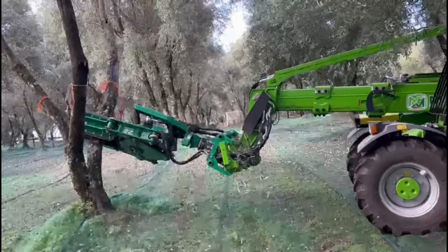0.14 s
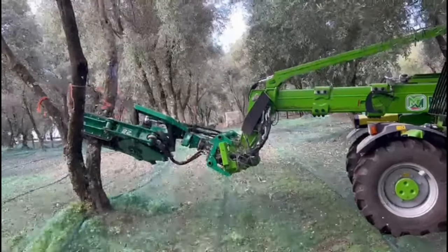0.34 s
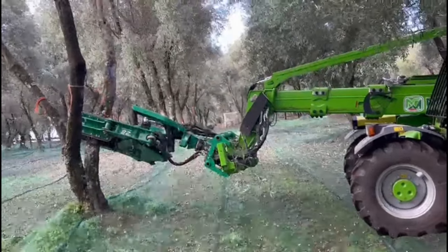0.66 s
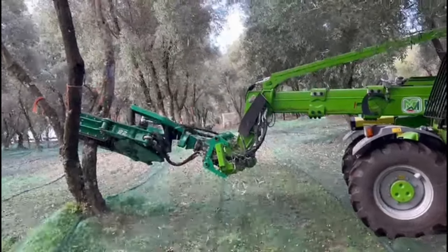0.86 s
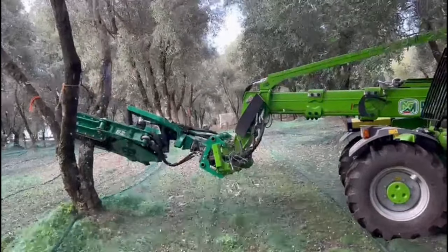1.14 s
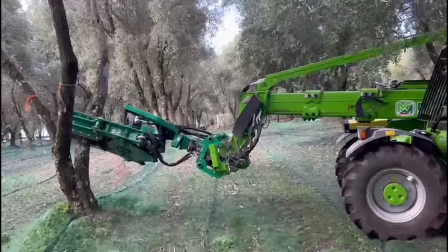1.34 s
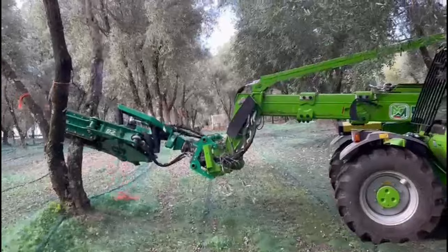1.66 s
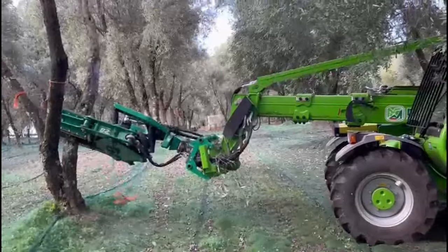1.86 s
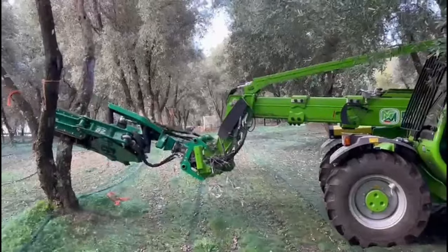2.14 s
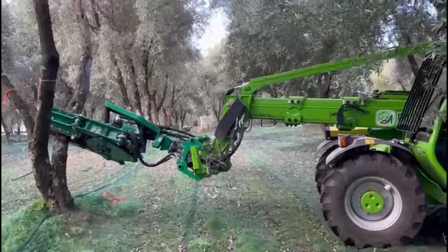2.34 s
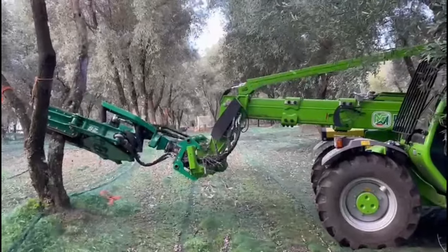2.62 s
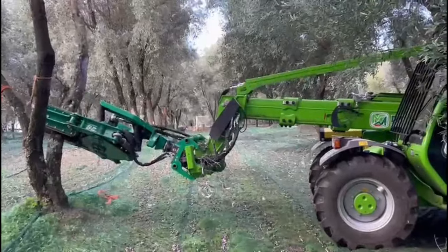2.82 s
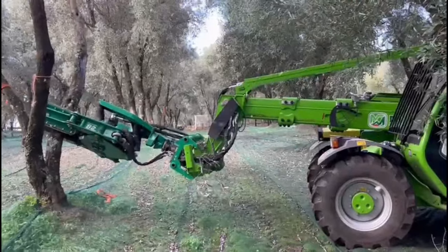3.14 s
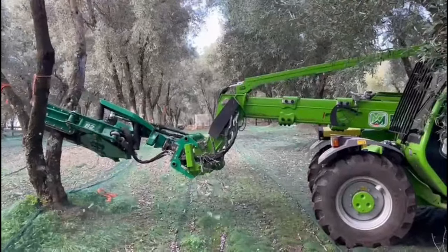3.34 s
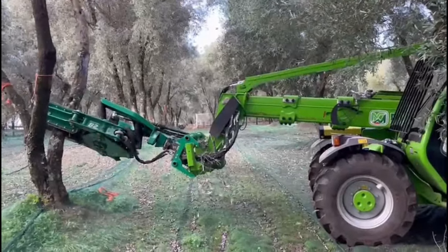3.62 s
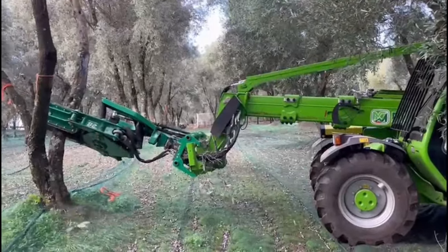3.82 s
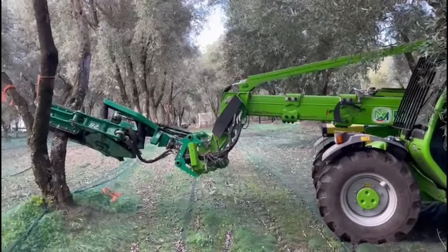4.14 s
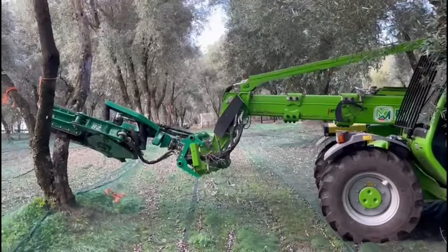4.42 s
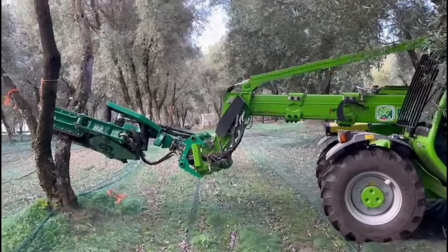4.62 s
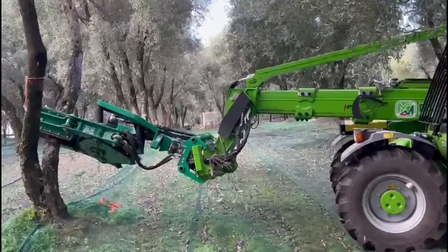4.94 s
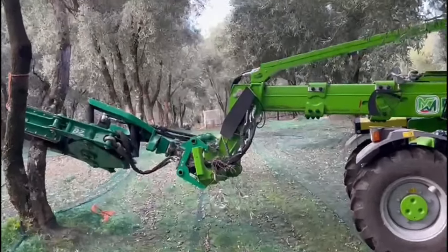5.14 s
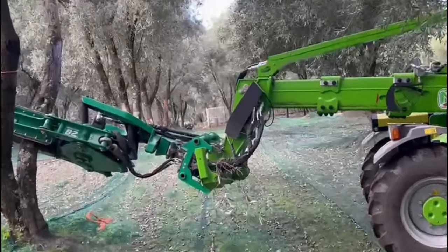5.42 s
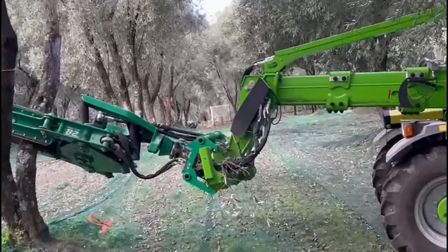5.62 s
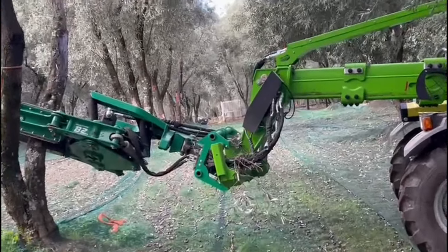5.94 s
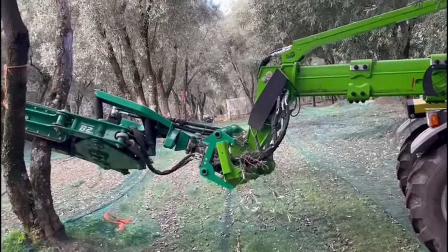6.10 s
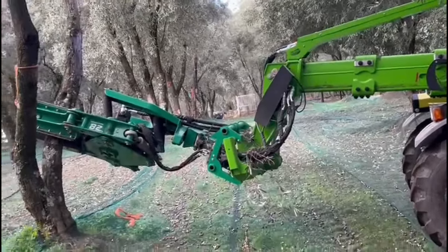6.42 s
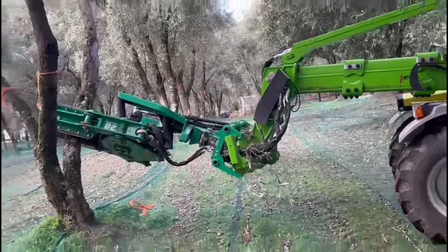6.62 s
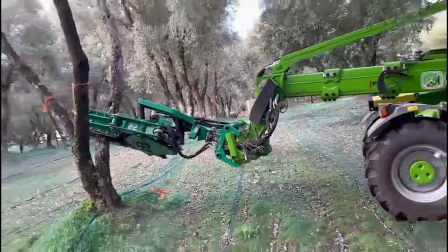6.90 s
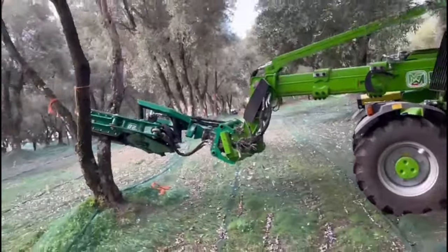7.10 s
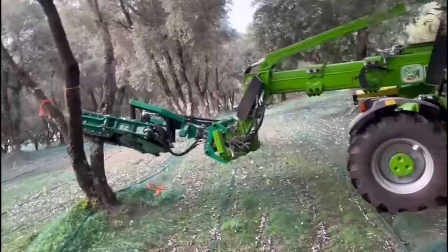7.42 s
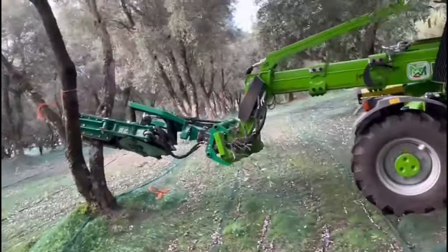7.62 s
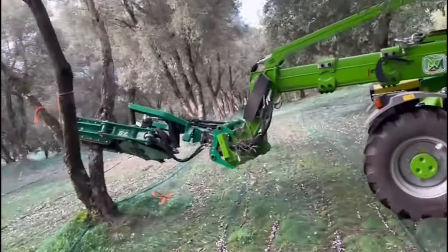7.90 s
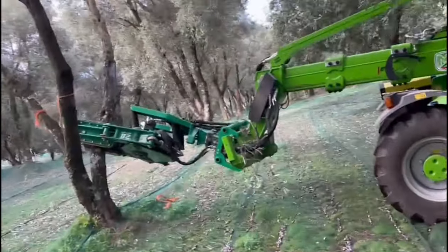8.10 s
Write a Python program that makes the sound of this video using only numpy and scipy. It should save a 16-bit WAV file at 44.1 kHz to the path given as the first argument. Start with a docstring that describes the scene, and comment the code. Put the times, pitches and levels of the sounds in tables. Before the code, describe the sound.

Outdoors in an olive grove, close stereo. A tractor-mounted shaker drones with a harsh, fast clamp rattle, whining oil drive and dense leaf hiss. After about two seconds it winds down, the boom shuddering and steel jaws knocking. The diesel drops to a clattering idle while olives tick and thud onto netted soil. Finally the engine revs up hard with rough howls and a thin whistle.

```python
"""An olive grove, outdoors: a tree a little left, a tractor a little right, a close pair of microphone ports.
A hydraulic shaker on the boom grips the tree: its weights hum at 28 turns a second, the clamp rattles on
slams twice a turn and the crown hisses with small leaf slaps. The weights run down, steel modes shudder and
knock, and olives patter as short noise bursts while the diesel, tones and impacts locked to its crank, idles.
Near the end the engine revs up again, with howls and a thin oil whistle; a faint drone runs throughout."""
import sys
import numpy as np
from scipy import signal
from scipy.fft import rfft, irfft
from scipy.io import wavfile

SR = 44100
rng = np.random.default_rng(int(sys.argv[2]) if len(sys.argv) > 2 else 0)


def transcribe(u):
    """Save the signal u as a 16-bit wav file named by the first command-line argument.

    u: samples, shape (n,) or (channels, n), limited to [-1, 1]; the rate is SR.
    q: integer samples, one column per channel.
    """
    v = np.clip(np.atleast_2d(u).T, -1, 1)
    q = np.round(v * 32767).astype(np.int16)
    wavfile.write(sys.argv[1], SR, q)


N = 364266
T = np.arange(N) / SR
HZ = np.fft.rfftfreq(N, 1 / SR)

# the driver shuts the oil valve and lets go of the throttle, then opens the throttle again (s)
STOP_S, REV_S = 2.39, 7.25
# crankshaft speed while shaking, idling and revved up (turns per s)
WORK_HZ, IDLE_HZ, FULL_HZ = 36.29, 15, 38.7
# time the engine takes to run down and to run up (s)
RUN_DOWN_S, RUN_UP_S = 1.2, 0.93


def gain_of(db):
    """Decibels to amplitude."""
    return 10 ** (np.asarray(db) / 20)


def evened(x):
    """Scaled to rms 1."""
    return x / np.sqrt(np.mean(x ** 2) + 1e-20)


def since(s):
    """Seconds gone by since time s, zero before it."""
    return np.maximum(T - s, 0)


def settle(s, length_s):
    """Goes from 0 to 1 after time s, quickly at first and easing in at the end."""
    return 1 - (1 - np.minimum(since(s) / length_s, 1)) ** 2


def bump(peak_s, half_s):
    """A smooth rise to 1 and fall around a moment."""
    return np.exp(-((T - peak_s) / half_s) ** 2)


def spectrum(rows):
    """Levels of a frequency table at every bin, joined by straight lines over log frequency."""
    rows = np.array(rows)
    return np.interp(np.log(HZ + 1), np.log(rows[:, 0]), rows[:, 1])


def drift(rate_hz):
    """Slow random wandering of rms 1."""
    smooth = np.exp(-(HZ / rate_hz) ** 2)
    return evened(irfft(rfft(rng.standard_normal(N)) * smooth, N))


def coloured(x, rows, band):
    """Causal filter with the given spectrum; white noise of rms 1 comes out with rms 1 inside the band (Hz)."""
    log_gain = np.log(gain_of(spectrum(rows)))
    mirrored = np.r_[log_gain, log_gain[-2:0:-1]]
    response = np.exp(np.conj(signal.hilbert(mirrored)))[:len(HZ)]  # minimum phase
    inside = (HZ > band[0]) & (HZ < band[1])
    return irfft(rfft(x) * response, N) / np.sqrt(np.mean(abs(response) ** 2 * inside))


def add(mix, s, sound):
    """Mixes a sound in at time s."""
    part = mix[round(s * SR):][:len(sound)]
    part += sound[:len(part)]


def turns_of(speed, wobble):
    """Angle of a shaft, in turns, whose speed wavers a little."""
    return np.cumsum(speed * (1 + wobble * drift(12))) / SR


# Resonances and a notch of the exhaust pipe and the boom's steel box, which lift or dip any tone crossing them.
# Each row: centre in Hz, width in Hz, lift in dB.
RESONANCES = [(67.6, 3.3, 7), (73.7, 3, -4), (80.1, 9.5, 8), (111, 6.8, 7), (132.5, 7.6, 12),
              (336.2, 51, 8.5)]


def tone(turns, multiple, db, waver):
    """One order of a shaft, wavering in level and lifted while it crosses a resonance."""
    hz = multiple * np.gradient(turns) * SR
    lift_db = sum(peak_db / (1 + (2 * (hz - centre) / width) ** 2) for centre, width, peak_db in RESONANCES)
    slow = np.interp(T, np.linspace(0, T[-1], 120), rng.standard_normal(120))
    level = np.sqrt(2) * gain_of(db + lift_db) * (1 + waver * slow)
    return level * np.sin(2 * np.pi * (multiple * turns + rng.random()))


def contacts(turns, rough, count):
    """Small impacts that come back at the same shaft angles every turn, mixed with a share of plain noise."""
    angle, size = rng.random(count), evened(rng.standard_normal(count))
    impact_turns = np.arange(int(turns[-1]) + 1)[:, None] + angle
    at = np.interp(impact_turns, turns, np.arange(N)).astype(int)
    clicks = np.bincount(at.ravel(), np.tile(size, len(at)), N) * (T < T[-1])
    repeating = clicks / np.sqrt(count * np.gradient(turns))
    share = np.clip(rough, 0, 1)
    return np.sqrt(1 - share) * repeating + np.sqrt(share) * rng.standard_normal(N)


def strokes(turns, decay, rest):
    """A burst that dies away within each cycle (decay in cycles), over a resting level."""
    return evened(rest + np.exp(-(turns % 1) / decay))


def crank_speed():
    """Crank turns per second: eased from working speed down to idle, and later up to full speed."""
    down = (IDLE_HZ - WORK_HZ) * settle(STOP_S, RUN_DOWN_S)
    up = (FULL_HZ - IDLE_HZ) * settle(REV_S, RUN_UP_S)
    return WORK_HZ + down + up


# Steady notes beside the engine. Each row: pitch in Hz, level in dB before resonances.
DRONE = [(187.5, -57), (586, -56.5), (600, -62.5), (809, -57.5)]


def drone():
    """A few faintly wavering notes hold their pitch whatever the engine does."""
    return sum(tone(turns_of(hz, wobble=0.0015), 1, db, waver=0.2) for hz, db in DRONE)


def whistle(pitch_hz=4135, slide_hz=130, level_db=-56, start_s=7.82, rise_s=0.2):
    """Oil rushing through a valve sings one thin note that slides up into its pitch."""
    rise = settle(start_s, rise_s)
    hz = (pitch_hz - slide_hz * (1 - rise)) * (1 + 0.003 * drift(60))
    return np.sqrt(2) * gain_of(level_db) * rise * np.sin(2 * np.pi * np.cumsum(hz) / SR)


# Howls of the run-up.
# Each row: multiple of crank speed, level in dB before resonances, loudest at in seconds, half length in seconds.
HOWLS = [(12.35, -40, 7.53, .12), (13, -41, 7.68, .055), (18.75, -49, 7.69, .07), (15.8, -42, 7.93, .05)]


def howl(crank):
    """Rough tones at multiples of crank speed flare up and die at set moments of the run-up."""
    return sum(bump(peak_s, half_s) * (1 + 0.25 * drift(45)) * tone(crank, k, db, waver=0.1)
               for k, db, peak_s, half_s in HOWLS)


# Exhaust note. Each row: multiple of crank speed, relative dB at idle, relative dB at full throttle.
EXHAUST = [(2, -14, 0.5), (3, -17, -12), (4, -1.5, -12), (5, -13, -8), (6, -8.5, -6.5), (8, -11.5, -13),
           (9, -16, -18)]
# Exhaust orders of the firing pulses, which answer the throttle first (multiples of crank speed).
FIRING_ORDERS = (2, 4)
# Gears and belt drives, while the speed holds steady.
# Each row: multiple of crank speed, dB at idle, dB at full throttle, before resonances.
GEARS = [(15, -72, -49), (18, -62.5, -74), (27, -70, -51), (29, -63.5, -70), (32, -68, -62), (34, -63, -63),
         (45, -66, -68), (57, -65.5, -72), (69, -67, -70)]
# Loudness of each cylinder's injector, in firing order, in dB.
CYLINDERS_DB = [2.2, -.8, -.3, -1.4]
# Spectra of the engine block, idling and pulling. Each row: frequency in Hz, relative dB per Hz.
BLOCK_IDLE = [(20, -6), (60, 8.5), (120, 1), (300, 3.5), (620, 1), (1250, -1), (1600, -5), (2500, -43),
              (6000, -36.5)]
BLOCK_PULLING = [(20, 7), (60, -2), (330, 12), (450, 4.5), (620, 4.5), (740, 1), (830, 3.5), (1040, 6.5),
                 (1130, -7), (1230, 1.5), (1600, -6), (2200, -13.5), (6000, -42)]
# Spectra of the injectors, idling and pulling. Each row: frequency in Hz, relative dB per Hz.
INJECTORS_IDLE = [(1650, -0.5), (2010, 10), (2280, 2), (2620, 5), (2790, 11), (3100, 1), (3260, 4),
                  (3650, 2.5), (3880, -6.5), (4600, -1.5), (4900, -6), (5800, -7), (6350, -12),
                  (8000, -14.5), (12000, -35)]
INJECTORS_PULLING = [(1400, -11), (1950, -1), (2270, -3.5), (2450, 3), (2560, -2), (2740, 6.5),
                     (2900, -2.5), (3240, 3), (3500, 1.5), (5000, -1.5), (7000, -5.5), (12000, -25)]


def exhaust_note(crank, pace, fuel, load):
    """Firing pulses sound as crank orders; their levels follow speed, fuel and load."""
    base_db = -52.5 - 0.5 * pace
    # the pulses hit harder while the engine still turns slowly under open throttle, which snaps open in 0.075 s
    revved_db = (14 + 3.5 * (1 - pace)) * settle(REV_S, 0.075)
    # opening the jaws loads the engine for a while
    jaws_db = 6.5 * (settle(3.41, 0.17) - settle(4.2, 0.17))
    # the upper orders burble as the engine sags into idle
    burble_db = 8 * bump(3.45, 0.35)
    note = 0
    for k, idle_db, full_db in EXHAUST:
        rev_db = revved_db * (1 if k in FIRING_ORDERS else load)
        extra_db = jaws_db if k < 7 else burble_db
        db = base_db + rev_db + extra_db + idle_db + (full_db - idle_db) * fuel
        note = note + tone(crank, k, db, waver=0.22)
    return note


def gear_tones(crank, load, sweep_hz_per_s=16):
    """Meshing teeth and belts sing at crank multiples and fade while the speed sweeps."""
    gears = sum(tone(crank, k, idle_db + (full_db - idle_db) * load, waver=0.18)
                for k, idle_db, full_db in GEARS)
    return gears / (1 + (np.gradient(crank_speed()) * SR / sweep_hz_per_s) ** 2)


def block_noise(crank, pace, cylinder, idle_db=-55, full_db=-43):
    """Firing thuds shake the block at idle; a steadier growl takes over as the engine pulls."""
    thuds = cylinder * contacts(crank, rough=0.55, count=600) * strokes(2 * crank, decay=0.21, rest=0.9)
    growl = contacts(crank, rough=0.65, count=300) * strokes(2 * crank, decay=0.25, rest=1.9)
    roar_db = 2.5 * bump(7.74, 0.12)  # harder while the engine gathers speed
    band = (850, 1300)
    idling = np.sqrt(1 - pace) * gain_of(idle_db) * coloured(thuds, BLOCK_IDLE, band)
    pulling = pace ** 0.62 * gain_of(full_db + roar_db) * coloured(growl, BLOCK_PULLING, band)
    return idling + pulling


def injector_clatter(crank, pace, cylinder, level_db=-60.5, pulling_db=7, swell_db=6):
    """Injectors tick twice a turn, unevenly by cylinder; the clatter swells for a while at idle."""
    ticks = np.sqrt(cylinder) * contacts(crank, rough=0.75, count=600) * strokes(2 * crank, decay=0.14, rest=0.9)
    band = (2000, 3600)
    idling = np.sqrt(1 - pace) * coloured(ticks, INJECTORS_IDLE, band)
    pulling = pace * gain_of(pulling_db) * coloured(ticks, INJECTORS_PULLING, band)
    swell = settle(4.75, 0.9) - settle(6.83, 0.9)
    return gain_of(level_db + swell_db * swell) * (idling + pulling)


def diesel(crank):
    """Four cylinders fire twice a turn: exhaust note, gear tones, block noise and injector clatter."""
    pace = np.clip((crank_speed() - IDLE_HZ) / (FULL_HZ - IDLE_HZ), 0, 1)  # 0 idle, 1 full speed
    fuel = np.maximum(settle(REV_S, 0.24), pace)  # builds up ahead of the speed
    load = pace ** 6  # counts only near full speed
    cylinder = gain_of(CYLINDERS_DB)[(2 * crank).astype(int) % len(CYLINDERS_DB)]
    tones = exhaust_note(crank, pace, fuel, load) + gear_tones(crank, load)
    return tones + block_noise(crank, pace, cylinder) + injector_clatter(crank, pace, cylinder)


# Spectrum of the leaves. Each row: frequency in Hz, relative dB per Hz.
LEAVES = [(300, -12), (1000, -1), (2500, 2), (5500, 1), (10500, 2), (11700, -6), (13000, -45)]


def crown(grain_db=2.0, grains_per_s=2500, hiss=2.1):
    """Thousands of leaves slap together; the rustle thins out to a faint stirring as the tree settles."""
    sizes = gain_of(grain_db * np.minimum(rng.exponential(1, N), 4))
    slaps = rng.standard_normal(N) * sizes * (rng.random(N) < grains_per_s / SR)
    rustle = evened(evened(slaps) + hiss * rng.standard_normal(N)) * gain_of(1.0 * drift(25))
    shaken = gain_of(-40) * np.exp(-(since(STOP_S) / 0.78) ** 1.29)
    stirring = gain_of(-66.5) * np.clip((6.13 - T) / 1.34, 0, 1)  # gone at 6.13 s
    return np.hypot(shaken, stirring) * coloured(rustle, LEAVES, (5000, 8500))


def patter(count=12, from_s=4.3, peak_s=0.55, level_db=-52, spread_db=3):
    """Rows like OLIVES for farther fruit at random, most often peak_s after from_s, then ever more rarely."""
    rows = []
    for a, b, *sizes in rng.random((count, 5)):
        levels_db = level_db + spread_db * (2 * np.array(sizes) - 1)
        rows.append((from_s - peak_s * np.log(a * b), *levels_db))
    return rows


# The nearest olives landing. Each row: start in seconds, tick in dB, tap in dB, thud in dB.
OLIVES = [(4.016, -44, -50, -60), (4.076, -54, -46, -55), (4.121, -50, -37.5, -46), (4.233, -52, -42, -42),
          (4.272, -52, -47, -45), (4.426, -49, -54, -56), (4.4448, -46, -51, -55), (4.556, -55, -45, -50),
          (4.637, -50, -48, -50), (4.6788, -48, -52, -54), (4.7601, -51, -42, -46), (4.814, -43, -50, -56),
          (4.9048, -48, -49, -56), (4.948, -45, -46, -46), (5.067, -48, -52, -56),
          (5.0972, -40.5, -45, -56), (5.1372, -45.5, -44, -44), (5.343, -47, -50, -54),
          (5.527, -47, -41, -47), (5.628, -39.5, -47, -50), (5.7413, -41.5, -45, -56),
          (5.787, -52, -42, -44)]
# Bands of an olive's tick, tap and thud. Each row: lower edge in Hz, upper edge in Hz.
OLIVE_BANDS = [(2500, 10000), (850, 1800), (450, 1000)]


def olives(tick_s=0.0025, tap_s=0.0034, thud_s=0.014):
    """A sharp tick on net or leaf, a soft tap below it, and a thud where the fruit reaches the soil."""
    out, t = np.zeros(N), T[:SR // 10]
    for s, *levels in OLIVES + patter():
        for db, band, decay_s in zip(levels, OLIVE_BANDS, (tick_s, tap_s, thud_s)):
            burst = signal.lfilter(*signal.butter(2, band, "band", fs=SR), rng.standard_normal(len(t)))
            add(out, s, gain_of(db) * evened(burst) * np.exp(-t / decay_s))
    return out


# Modes of the boom, then of the clamp's jaws.
# Each row: frequency in Hz, relative dB, time to fall by 60 dB in seconds.
BOOM_MODES = [(57, -5, 0.25), (170.8, -3, 0.41), (309, -6, 0.14), (336, -1.5, 0.11), (377.7, -8, 0.16),
              (443, -17.5, 1.36)]
JAW_MODES = [(453, 0, 0.2), (658, -0.5, 0.1), (934, -2, 0.18)]
# The boom shudders as the weights slow, then the slack jaws knock.
# Each row: start in seconds, level in dB, frequency driven hardest in Hz, crack in dB relative to the ring.
SHUDDERS = [(2.675, -12, 335, -33), (2.755, -12.5, 338, -34), (2.84, -11, 338, -38),
            (2.885, -15.5, 338, -34), (2.9205, -23.5, 338, -34), (2.965, -23, 225, -35),
            (3.04, -23, 57, -36), (3.165, -29.5, 70, -37), (3.265, -36, 380, -25)]
KNOCKS = [(3.429, -34.5, 655, -9), (3.559, -47, 655, 3.5), (3.648, -32, 460, -10.5), (3.685, -24, 655, -23),
          (3.698, -24, 647, -26), (4.645, -39, 920, -24)]


def knocks(blows, modes, swell_s, octave_db, crack_s=0.017, crack_hz=2200):
    """Each blow swells into the steel's modes, weaker by the octave from where it drives hardest, with a crack."""
    out, t = np.zeros(N), T[:SR]
    for s, db, driven_hz, crack_db in blows:
        ring = 0
        for hz, mode_db, t60 in modes:
            driven_db = mode_db - octave_db * abs(np.log2(hz / driven_hz))
            fall_db = 60 * np.maximum(t - swell_s, 0) / t60
            ring = ring + np.sin(2 * np.pi * hz * t) * gain_of(driven_db - fall_db)
        dull = signal.lfilter(*signal.butter(1, crack_hz, fs=SR), rng.standard_normal(len(t)))
        crack = evened(dull) * np.exp(-t / crack_s)
        add(out, s, gain_of(db) * (ring * np.minimum(t / swell_s, 1) + gain_of(crack_db) * crack))
    return out


# Hum of the weights at working speed.
# Each row: multiple of their speed, level in dB before swing and resonances.
HUM = [(1, -56), (2, -44), (3, -39), (4, -44.5), (5, -35.5), (6, -35), (8, -41), (10, -40), (11, -37),
       (12, -44.5), (18, -41), (20, -33), (22, -37.5), (30, -43.5)]


def weights_hum(turns, force, swing_first_db=-14, swing_full_db=8, swing_build_s=2.9, drive_half_s=0.19):
    """Unbalanced weights hum in orders: the low ones swing on, the upper ones need the oil's drive."""
    # the swing of trunk and boom builds up in the two lowest orders
    swing_db = swing_first_db + (swing_full_db - swing_first_db) * settle(0, swing_build_s)
    drive = 1 / (1 + (since(STOP_S) / drive_half_s) ** 4)
    return sum(tone(turns, k, db + swing_db * (k <= 2), waver=0.082) * (force if k <= 3 else drive)
               for k, db in HUM)


# Spectrum of the clamp. Each row: frequency in Hz, relative dB per Hz.
CLAMP = [(20, -11), (60, 0.5), (250, -5.5), (340, 6), (480, 1.5), (600, 2), (700, -5.5), (820, -0.5),
         (950, -7.5), (1400, -7), (1800, -8), (2100, -20), (2500, -18), (8000, -53)]
# Chatter in the bright part of the rattle. Each row: beats per turn, depth from 0 to 1.
CHATTER = [(1, .19), (2, .19), (3, .16)]


def clamp_rattle(turns, force, level_db=-27, slack_s=2.812, half_s=0.066, dull_hz=800):
    """The clamp slams the trunk twice a turn, once brighter; gentler slams are duller, slack jaws quieter."""
    slams = strokes(2 * turns, decay=0.4, rest=3)
    impacts = contacts(turns, rough=0.74, count=1500) * slams * gain_of(0.6 * drift(25))
    rattle = coloured(impacts, CLAMP, (400, 900))
    soft = signal.sosfiltfilt(signal.butter(2, dull_hz, fs=SR, output="sos"), rattle)
    beat = evened(1 + sum(depth * np.sin(2 * np.pi * k * turns) for k, depth in CHATTER))
    grip = gain_of(level_db) / (1 + since(slack_s) / half_s)
    return grip * (soft + np.sqrt(force) * beat * (rattle - soft))


# Whine of the shaker's gear motor. Each row: multiple of the weights' speed, level in dB before resonances.
MOTOR = [(90, -54), (100, -58), (110, -56), (120, -61), (130, -57), (131, -59), (161, -62), (202, -61),
         (209, -62), (231, -63)]
# Whine of the oil pump. Each row: multiple of crank speed, level in dB before resonances.
PUMP = [(5, -41.5), (9.5, -33.5), (10, -42.5), (12, -40)]


def oil_whine(turns, crank, rough_db=4, rough_hz=35, valve_s=0.72):
    """Gear motor and pump whine, the motor broken up at random, until the oil valve has closed."""
    motor = sum(tone(turns, k, db, waver=0.5) * evened(gain_of(rough_db * drift(rough_hz))) for k, db in MOTOR)
    pump = sum(tone(crank, k, db, waver=0.057) for k, db in PUMP)
    return (1 - settle(STOP_S, valve_s)) * (motor + pump)


def shaker(crank, weights_hz=27.99, coast_s=0.65, still_s=3.59, rest_s=0.41):
    """Spinning weights hum, the clamp rattles and the oil drive whines, until all comes to rest."""
    spin = 1 / (1 + (since(STOP_S) / coast_s) ** 3)  # half speed after coast_s
    turns = turns_of(weights_hz * spin, wobble=0.00083)
    force = spin ** 2  # centrifugal
    running = np.clip((still_s - T) / rest_s, 0, 1)
    return running * (force * weights_hum(turns, force) + clamp_rattle(turns, force) + oil_whine(turns, crank))


# Bands in which left and right fall further out of step, so that these frequencies sound wide rather than
# centred. Each row: centre in Hz, half width in Hz, phase in radians.
PORT_BANDS = [(1537, 163, 1.04), (3260, 600, 0.54), (9920, 1170, 2.68)]


def ports(x, delay_s, treble_phase, direct, scatter_s=0.05):
    """The two ports hear a source out of step, partly straight and partly scattered by ground and trunks."""
    low = 1 / (1 + (HZ / 1675) ** 12)  # the path difference counts only below this corner in Hz
    high = 1 / (1 + (2520 / (HZ + 1)) ** 12)  # the treble is out of step from here
    phase = 0.0065 + 2 * np.pi * HZ * delay_s * low + treble_phase * high
    phase = phase + sum(radians * np.exp(-((HZ - hz) / width) ** 8) for hz, width, radians in PORT_BANDS)
    echoes = rng.standard_normal(N) * np.exp(-T / scatter_s)
    scattered = np.exp(1j * np.angle(rfft(echoes)))
    share, z = np.clip(direct, 0, 1), rfft(x)
    mid = z * np.cos(phase / 2)
    side = z * np.sin(phase / 2) * (-1j * np.sqrt(share) + np.sqrt(1 - share) * scattered)
    return irfft(np.array([mid + side, mid - side]), N)


def scene():
    """The tree a little to the left, the tractor to the right."""
    crank = turns_of(crank_speed(), wobble=0.0025)
    engine_side = drone() + whistle() + howl(crank) + diesel(crank)
    boom = knocks(SHUDDERS, BOOM_MODES, swell_s=0.015, octave_db=8.0)
    jaws = knocks(KNOCKS, JAW_MODES, swell_s=0.0038, octave_db=46)
    tree_side = crown() + olives() + boom + jaws + shaker(crank)
    tractor = ports(engine_side, delay_s=0.00019, treble_phase=0.27, direct=0.94)
    tree = ports(tree_side, delay_s=0.00007, treble_phase=0.69, direct=0.38)
    return tree * gain_of([[0.35], [-0.35]]) + tractor * gain_of([[-0.3], [0.3]])  # left, right in dB


def record(dry, edge_hz=12200):
    """The recorder's band limit."""
    low_pass = signal.firwin(511, edge_hz, window=("kaiser", 9), fs=SR)
    return signal.oaconvolve(dry, low_pass[None], "same")


dry = scene()
out = record(dry)
transcribe(out)
```